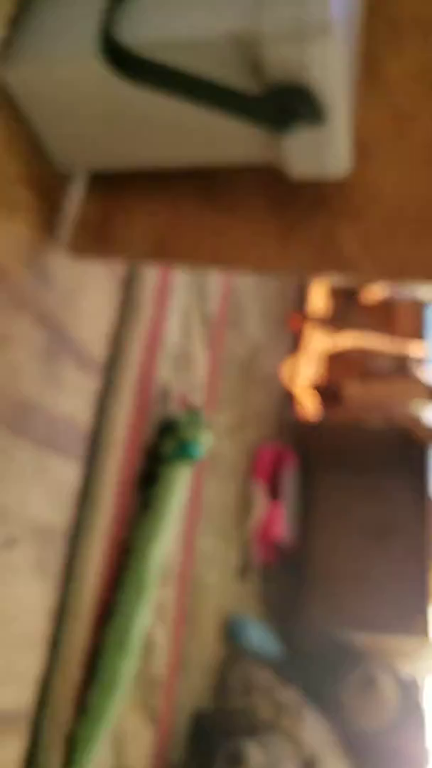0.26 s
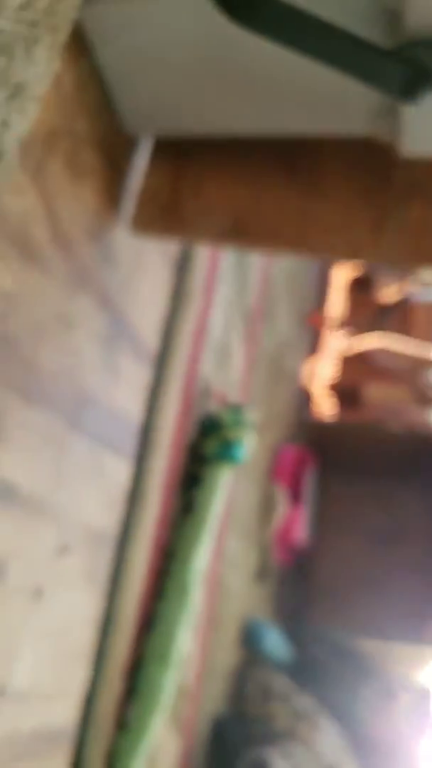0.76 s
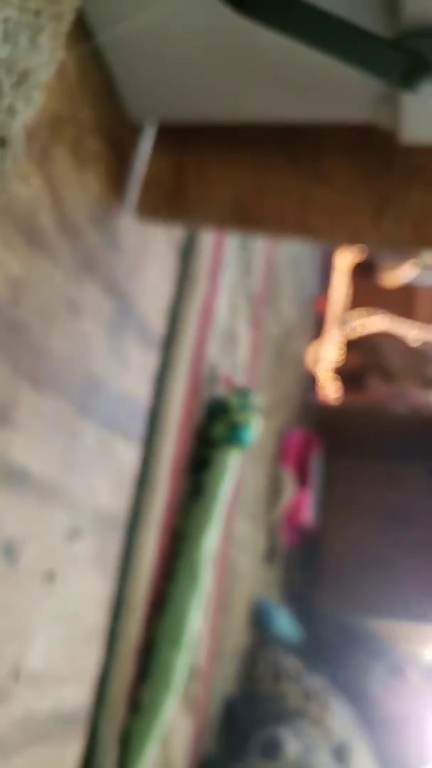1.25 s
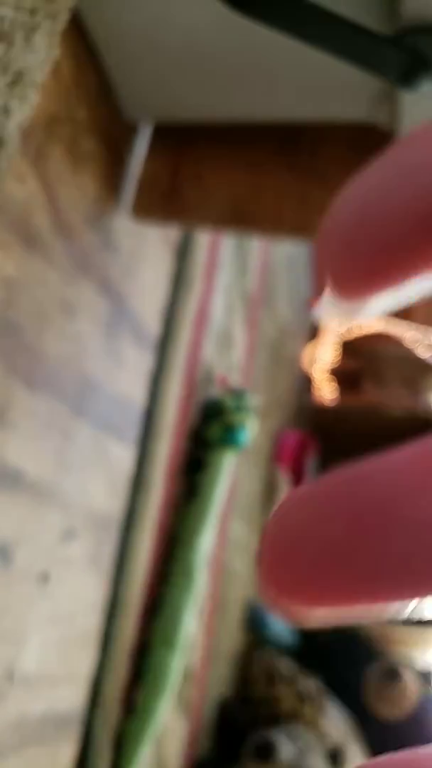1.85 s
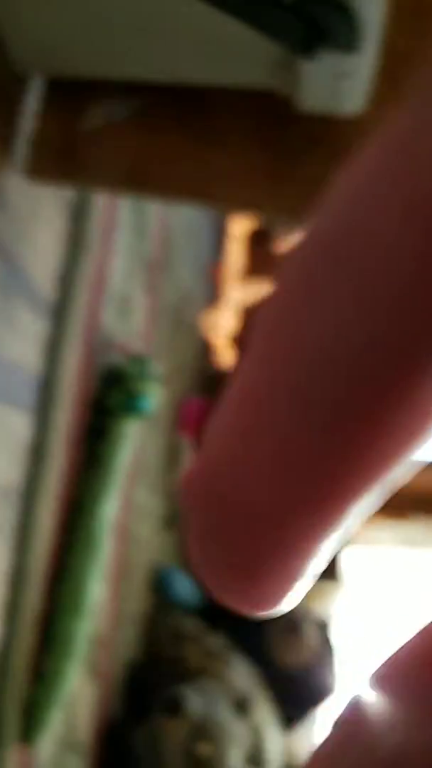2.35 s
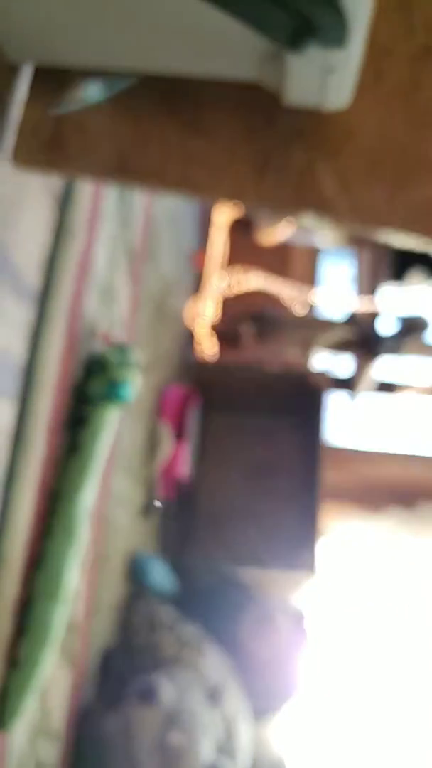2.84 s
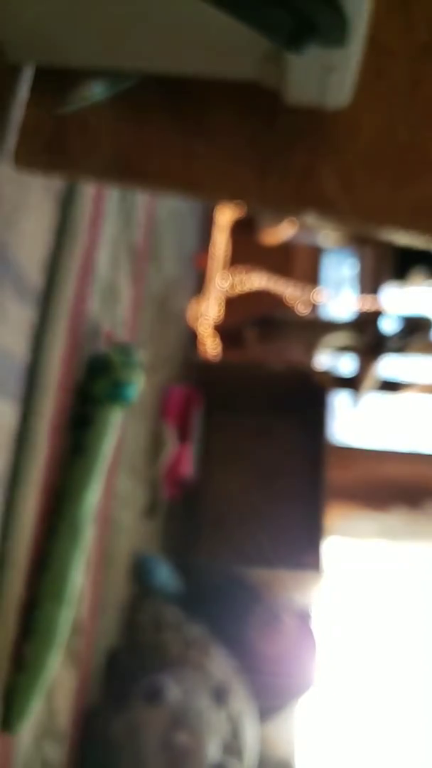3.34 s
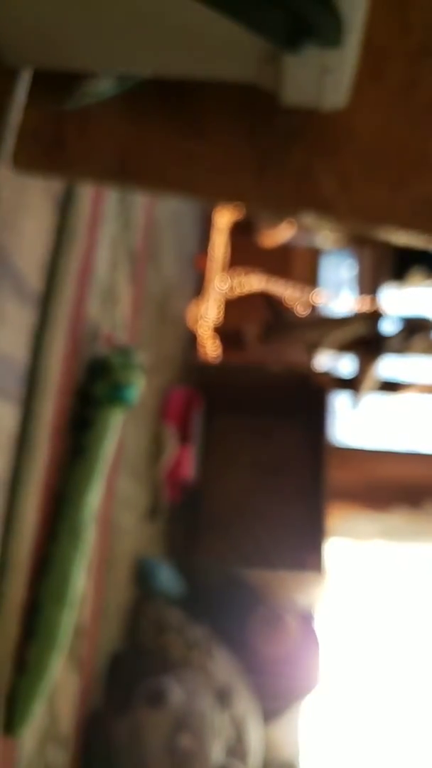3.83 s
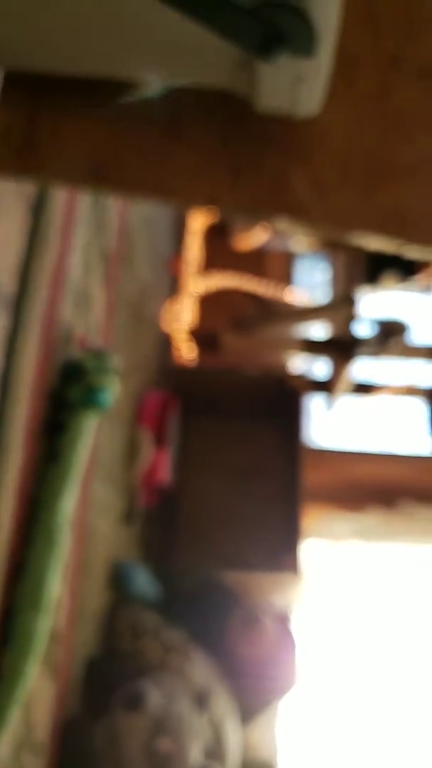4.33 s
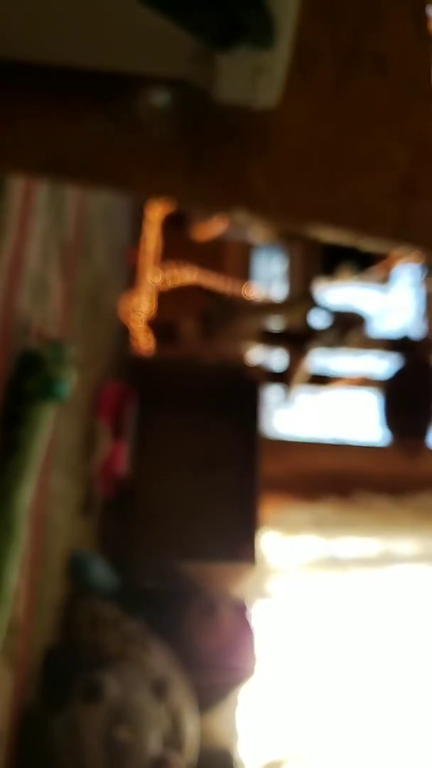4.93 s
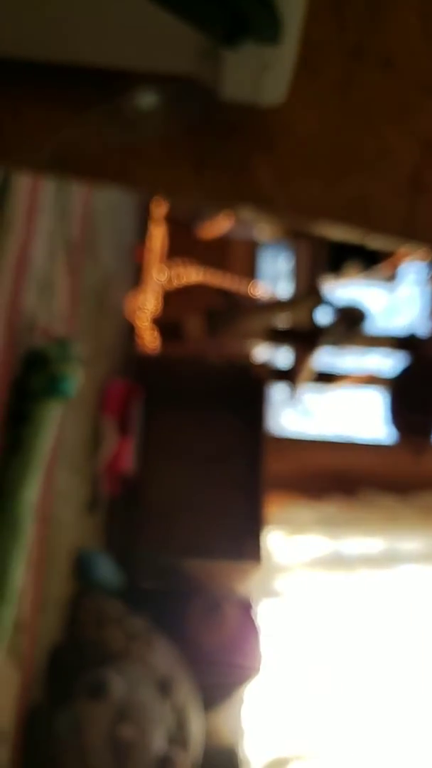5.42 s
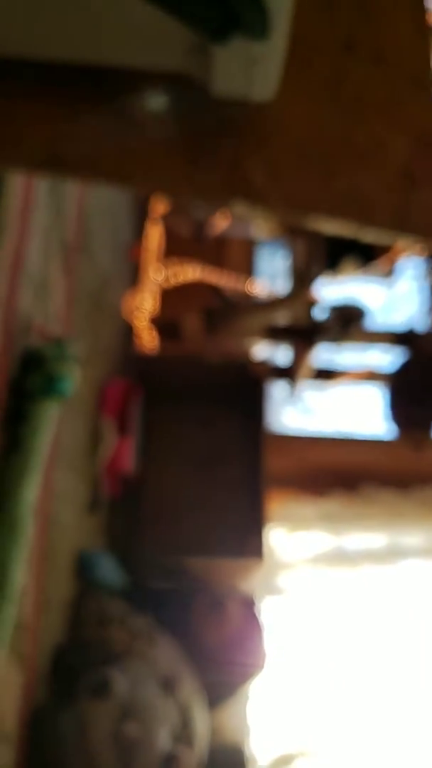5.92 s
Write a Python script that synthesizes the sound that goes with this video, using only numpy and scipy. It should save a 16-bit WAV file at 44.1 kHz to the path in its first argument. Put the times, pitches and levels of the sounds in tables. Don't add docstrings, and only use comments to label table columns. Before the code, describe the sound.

Kittens play around a low hand-held microphone indoors. First a rustling cloth rub with dull taps and thumps on the case, then brisk finger scrapes and dry clicks close on the left. A very loud snap stands out past the middle. Quieter scuffs follow, then a faint joint squeak, wooden knocks and a toy bouncing rapidly, all dry, with a distant pulsing washer beneath.

```python
import sys
import numpy as np
from scipy import signal
from scipy.fft import rfft, irfft, next_fast_len
from scipy.io import wavfile
from scipy.ndimage import uniform_filter1d

SR = 44100
rng = np.random.default_rng(int(sys.argv[2]) if len(sys.argv) > 2 else 0)


def decibels_to_gain(level_db):
    exponent = np.asarray(level_db, float) / 20
    return 10 ** exponent


def dump(signal):
    limited = np.clip(np.atleast_2d(signal).T, -1, 1)
    pcm = np.round(limited * 32767).astype(np.int16)
    wavfile.write(sys.argv[1], SR, pcm)


N = 271587

TOP_HZ = 15700


def evened(x):
    return x / np.sqrt(np.mean(x ** 2) + 1e-20)


def read(points, hz):
    f, value = np.transpose(points)
    return np.interp(np.log(hz + 1), np.log(f + 1), value)


def along(rows):
    s, *columns = np.transpose(rows)
    t = np.arange(s[0], s[-1], 1 / SR)
    return t, *(np.interp(t, s, c) for c in columns)


def add(mix, s, sound):
    part = mix[:, round(s * SR):][:, :sound.shape[1]]
    part += sound[:, :part.shape[1]]


def sides(lean_db):
    right = decibels_to_gain(-np.asarray(lean_db, float))
    return np.array([2 / (1 + right), 2 * right / (1 + right)])


def resonate(x, hz, width):
    pole = np.exp((2j * hz - width) * np.pi / SR)
    return 2 * signal.lfilter([1 - abs(pole)], [1, -pole], x).real


def band(x, colours, lo_hz, hi_hz, ref_lo_hz, ref_hi_hz):
    hz = np.fft.rfftfreq(x.shape[-1], 1 / SR)
    edges = 1 / np.sqrt((1 + (lo_hz / (hz + 1)) ** 12) * (1 + (hz / hi_hz) ** 12))
    colour = decibels_to_gain(np.array([read(c, hz) for c in colours]))
    z = rfft(x) * colour * edges * (hz < TOP_HZ)
    inside = irfft(z.mean(axis=0) * (hz > ref_lo_hz) * (hz < ref_hi_hz), x.shape[-1])
    return irfft(z, x.shape[-1]) / inside.std()


def friction(t, level_db, grip, colours, catch_db, grain_s, same):
    # lower edge f/Hz, upper edge f/Hz, reference from f/Hz, reference to f/Hz
    registers = [(1350, 9300, 1500, 8000), (9300, 30000, 10500, 15500), (200, 1350, 300, 1300)]
    fine_db, dull_db, right_db, fine_right_db = grip
    a, b, c = rng.standard_normal((next_fast_len(len(t) + 2048), 3)).T
    clumps = decibels_to_gain(catch_db * evened(uniform_filter1d(c, size=int(grain_s * SR))))
    slips = clumps * np.array([a, same * a + np.sqrt(1 - same ** 2) * b])
    body, fine, dull = (band(slips, colours, *edges)[:, :len(t)] for edges in registers)
    body[1] *= decibels_to_gain(right_db)
    fine[1] *= decibels_to_gain(fine_right_db)
    edge = np.clip(np.minimum(t + (t[0] == 0) - t[0], t[-1] - t) / 0.001, 0, 1)
    return t[0], decibels_to_gain(level_db) * (body + decibels_to_gain(fine_db) * fine + decibels_to_gain(dull_db) * dull) * edge


def rub(start, length, shape, level_db, grip, tilt_db=0):
    # f/Hz, spectral level/dB per Hz
    rub_colour = [
        [(200, -95), (550, -86.5), (1100, -86), (1600, -80.5), (2600, -71), (3100, -73), (3700, -69), (5200, -74.5), (7100, -73), (8500, -92), (10500, -95.5), (13000, -90.5), (15200, -89.5)],
        [(200, -87.5), (550, -93), (1100, -93.5), (1600, -94), (2600, -93.5), (3100, -94.5), (3700, -101.5), (5200, -99), (7100, -101), (8500, -105), (10500, -110), (13000, -104), (15200, -106)],
    ]
    t = np.arange(start, start + length, 1 / SR)
    colours = [[(hz, db + tilt_db * np.log2(hz / 3000)) for hz, db in port] for port in rub_colour]
    return friction(t, level_db + shape((t - start) / length), grip, colours, 1.9, 0.0033, 0.4)


def distant_grip(fine_db, dull_db):
    return fine_db, dull_db, 10 + .4 * dull_db, 9


def blow(row, modes, low_hz, high_hz, contact_s, tail_db, tail_t60, far_tilt_db, spread=.022, swell=0):
    s, peak_db, spot_hz, high_db, low_db, lean_db = row
    spot = (spot_hz, 3.0, 6.0 / spot_hz)
    hz, db, t60 = np.transpose(modes + [spot])[:, :, None]
    t, swing, hz = np.arange(4000) / SR, np.sign(hz), abs(hz)
    is_mode = (np.arange(len(hz)) < len(modes))[:, None]
    db = db + np.where(hz < low_hz, low_db, 0) + np.where(hz > high_hz, high_db, 0) * is_mode
    detune = 1 + spread * rng.standard_normal(hz.shape)
    low = hz < 600
    onset = (1 - np.exp(-t / (contact_s + swell * low / hz))) ** 2
    rings = swing * decibels_to_gain(db - 60 * t / t60) * np.sin(2 * np.pi * hz * detune * t) * onset
    dulled = rings * decibels_to_gain(far_tilt_db * np.log2(hz / 1500))
    far = (dulled * low).sum(axis=0) + np.roll((dulled * ~low).sum(axis=0), 22)
    scatter = decibels_to_gain(tail_db - 60 * t / tail_t60) * rng.standard_normal(len(t)) * (t > .001)
    scatter += t == 0
    sound = signal.fftconvolve(np.array([rings.sum(axis=0), far]), scatter[None], axes=1)
    sound /= abs(sound).max(axis=1, keepdims=True)
    return s + 0.00088, decibels_to_gain(peak_db) * sides(lean_db)[:, None] * sound


def room_tone():
    # f/Hz, spectral level/dB per Hz
    tone_colour = [
        [(25, -92), (53, -82), (120, -84), (170, -98), (400, -112), (1900, -117), (2400, -106), (3000, -117), (5400, -116), (5900, -110), (7300, -110), (8000, -128), (10500, -126), (15200, -114)],
        [(25, -91), (53, -83), (120, -84), (170, -96), (400, -113), (1500, -117), (2400, -120), (5000, -121), (6800, -124), (8600, -130), (10500, -125), (12500, -117), (15200, -121)],
    ]
    # f/Hz, likeness of the ports/1
    likeness = [(60, 0.85), (240, 1), (950, 0.083), (3770, 0.013), (15000, 0.01)]
    # f/Hz, rms level/dB
    hum_lines = [(113.8, -66), (52, -65.5)]
    frames, hz = N // 256 + 5, np.fft.rfftfreq(1024, 1 / SR)
    a, b, c, d, patches = rng.standard_normal((frames, 513, 5)).T
    patches = uniform_filter1d(patches, size=12, axis=0)
    patches = evened(uniform_filter1d(patches, size=14, axis=1))
    same = np.clip(read(likeness, hz), -1, 1)[:, None]
    left = a + 1j * b
    z = np.array([left, same * left + np.sqrt(1 - same ** 2) * (c + 1j * d)])
    colour_db = np.array([read(port, hz) for port in tone_colour])[:, :, None]
    z *= decibels_to_gain(colour_db + 1.5 * patches) * (hz < TOP_HZ)[:, None]
    hiss = signal.istft(z, nperseg=1024, noverlap=768)[1][:, :N]
    hum = sum(decibels_to_gain(db) * evened(resonate(resonate(rng.standard_normal(N), f, 7.0), f, 30)) for f, db in hum_lines)
    return decibels_to_gain(-61.5) * evened(hiss) + hum


def washer():
    # f/Hz, rms level/dB
    motor = [(156.1, -65), (296.1, -79), (360.7, -95.5), (597.5, -81.5), (721.4, -81.5), (791.3, -81.5),
             (839.8, -85), (947.5, -86)]
    # f/Hz, width/Hz, level/dB
    load = [(680, 230, -75), (820, 320, -79), (300, 130, -80.5), (190, 90, -73.5)]
    # f/Hz, peak level/dB, decay time t60/s
    reversal = (99.4, -28.5, 0.14)
    first_s, period_s = .40, .804
    since = (np.arange(N) / SR - first_s) % period_s
    pull = np.interp(since, [0, .06, .16, .46, .54, 1], [0.78, 0.47, 0.93, 0.63, 0, 0.087])
    noise = rng.standard_normal((2, N))
    tones = sum(decibels_to_gain(db) * evened(resonate(resonate(noise[0], f, 5.0), f, 40)) for f, db in motor)
    swish = sum(decibels_to_gain(db) * evened(resonate(resonate(noise, f, w), f, w)) for f, w, db in load)
    thud_hz, thud_db, thud_t60 = reversal
    thud = decibels_to_gain(thud_db - 60 * since / thud_t60) * np.sin(2 * np.pi * thud_hz * since)
    thud *= np.minimum(since / 0.077, 1)
    return pull * (tones * sides(-2.5)[:, None] + swish) + thud


def room(x):
    # f/Hz, decay time t60/s
    decay = [(200, 0.25), (1000, 0.11), (8000, 0.014)]
    echoes = np.zeros((2, SR // 2))
    at = np.arange(200, SR // 2 - 20, 20) + rng.integers(0, 20, (2, (SR // 2 - 201) // 20))
    np.put_along_axis(echoes, at, rng.choice([-1., 1.], at.shape), 1)
    hz, t, z = signal.stft(echoes, SR, nperseg=256)
    tail = signal.istft(z * decibels_to_gain(-60 * t / read(decay, hz)[:, None]), SR, nperseg=256)[1]
    return signal.fftconvolve(x.mean(axis=0)[None], tail / np.linalg.norm(tail[0]), axes=1)[:, :N]


def squeak():
    # t/s, f/Hz, level/dB, second harmonic relative to the first/dB
    pitch = [
        (5.215, 372, -67, -8),
        (5.275, 330, -60, -22),
        (5.335, 362, -62, -22),
        (5.37, 358, -62, -18),
        (5.40, 410, -68, -18),
        (5.47, 440, -68, -14),
        (5.54, 457, -65, -11),
        (5.66, 457, -65.5, -12),
        (5.89, 497, -72, -6),
    ]
    t, hz, level_db, second_db = along(pitch)
    levels_db = level_db, level_db + second_db, level_db + second_db - 15
    loose = np.interp(hz, [350, 440], [.05, .009])
    wander, flutter = (evened(uniform_filter1d(v, size=400)) for v in rng.standard_normal((len(t), 2)).T)
    turns = np.cumsum(hz * (1 + loose * wander)) / SR
    tone = sum(decibels_to_gain(db) * np.sqrt(2) * np.sin(2 * np.pi * (k + 1) * turns) for k, db in enumerate(levels_db))
    breath = evened(uniform_filter1d(rng.standard_normal(len(t)), size=250))
    tone += decibels_to_gain(level_db) * 11 * loose * breath * np.cos(2 * np.pi * turns)
    return t[0], tone * decibels_to_gain(1.6 * flutter) * sides(5.0)[:, None] * signal.windows.tukey(len(t), .06)


def board_blows(mix):
    # f/Hz, level/dB, decay time t60/s
    board = [(185, 0, 0.035), (355, 1.5, 0.042), (530, -9, 0.04), (690, -3, 0.016), (1226, 4, 0.012),
             (1755, -2, 0.008), (2750, 8, 0.0066), (4050, -7, 0.0083), (5100, -2, 0.006),
             (7000, -10, 0.0057)]
    # t/s, peak level/dB, strongest ring f/Hz, low modes/dB, left-right/dB
    knocks = [(4.937, -50, 654, -5, -16), (5.099, -62.5, 776, -12, 15), (5.211, -61, 686, -3, -1.5),
              (5.448, -58, 607, -2, 8), (5.501, -48, 610, -4, -1), (5.522, -51, 1200, -17, 9),
              (5.683, -52.5, 800, -5, 5.5), (5.822, -43, 877, -1, -7), (5.8525, -39, 1300, -4, -2.5)]
    # t/s, peak level/dB, low modes/dB, left-right/dB
    rattle = [(5.909, -28.5, -36, 7), (5.912, -28.5, -12, -4), (5.9156, -28.5, -6.5, 3),
              (5.92, -47, -18, 4), (5.9397, -29, -14.5, -4.5), (5.947, -29, -9.5, -7),
              (5.9534, -29.5, -18, 2.5), (5.998, -25.5, -13.5, 0), (6.0038, -28, -12, 0)]
    knocked = [(s, db, hz, -13, *rest) for s, db, hz, *rest in knocks]
    bounced = [(s, db, 1230, 25 + 1.22 * db, *rest) for s, db, *rest in rattle]
    for rows, knee_hz in ((knocked, 1000), (bounced, 2200)):
        for row in rows:
            add(mix, *blow(row, board, 600, knee_hz, 0.00025, -29, 0.062, -6.0, swell=.5))


def case_taps(mix):
    # f/Hz, level/dB, decay time t60/s
    case = [(273, 0, 0.019), (420, 2.5, 0.01), (1220, -9.5, 0.0065), (1510, -4.5, 0.0087),
            (1770, -12, 0.0013), (2416, -1.5, 0.0055), (2944, -18.5, 0.028), (4260, 7.5, 0.012),
            (4926, 2, 0.018), (7000, -13, .004)]
    # t/s, peak level/dB, strongest ring f/Hz, low modes/dB, left-right/dB
    tap_rows = [(0.24, -37, 430, -5, -2), (0.287, -38, 410, -6, -0.5), (0.57, -48, 1300, -28, 12.5),
                (1.665, -43.5, 834, -12.5, 10), (2.222, -21, 2270, -27, 13), (2.2245, -32, 950, -20, 13),
                (2.3846, -46, 1690, -30, 3), (2.472, -42, 3300, -30, 5), (3.406, -52, 1290, -18, 9),
                (3.977, -30, 1493, -10.5, 8), (4.286, -47, 1260, -15.5, 6.9), (6.023, -35.5, 1500, -14, 3)]
    for s, db, hz, *rest in tap_rows:
        add(mix, *blow((s, db, hz, -28, *rest), case, 700, 3500, 0.00026, -24, .012, -9.0))


def soft_blows(mix):
    # (t/s, peak level/dB, broad ring f/Hz, left-right/dB, scatter/dB) and the modes
    # f/Hz (negative: swings against the blow), level/dB, decay time t60/s
    paw = (0.758, -24, 1750, 12, -25), [(415, -14, .018), (-800, -12, .009), (1240, -2, .009),
           (1770, -9, .007), (-2900, -12, .005), (3850, -12, .004), (-5500, -8, .002)]
    toy = (0.8765, -12, 1750, 10, -33), [(807, -18, .015), (-1300, 0, .006), (-2550, -1, .005),
           (3120, -9, .006), (3950, -17, .008), (-4700, -9, .003)]
    claw = (1.062, -23, 2850, 11, -22), [(-700, -22, .008), (1280, -8, .007), (-1900, -7, .004),
            (2860, -2, .006), (-4050, -9.5, .006), (5150, -7, .006), (8400, -22, .004)]
    drop = (2.2165, -20, 2300, 9.5, -20), [(296, -11, .013), (-937, -14, .008), (1370, -7, .006),
            (-1830, -8, .005), (-3070, -8, .004), (6500, -16, .003)]
    for (s, db, hz, lean_db, tail_db), modes in (paw, toy, claw, drop):
        add(mix, *blow((s, db, hz, 0, 0, lean_db), modes, 0, SR, .00025, tail_db, .025, -8.0, 0))


def shove():
    # t/s, rocking f/Hz, level/dB
    rocking = [
        (1.588, 95, -62),
        (1.605, 80, -43),
        (1.63, 50, -42),
        (1.67, 48, -48),
        (1.71, 55, -49),
        (1.755, 58, -58),
        (1.785, 68, -49),
        (1.82, 55, -62),
    ]
    t, hz, level_db = along(rocking)
    rock = np.sqrt(2) * np.sin(2 * np.pi * np.cumsum(hz) / SR) * signal.windows.tukey(len(t), .1)
    return t[0], decibels_to_gain(level_db) * rock * sides(22.0)[:, None]


def creak(start, length, hz, level_db, blur_hz):
    t = np.arange(0, length, 1 / SR)
    phase_walk = np.cumsum(rng.standard_normal(4000))[:len(t)]
    turns = hz * t + phase_walk * np.sqrt(abs(blur_hz) / (2 * np.pi * SR))
    shape = np.interp(t / length, [0, .3, 1], [0, 1, 0])
    return start, decibels_to_gain(level_db) * 2 * shape * np.sin(2 * np.pi * turns) * sides(8)[:, None]


def creaks(mix):
    # t/s, length/s, f/Hz, level/dB, blur/Hz
    creak_rows = [(0.617, .014, 750, -60, 60), (0.846, .018, 1060, -56, 30), (0.857, .012, 720, -52, 30),
                  (0.888, .02, 2150, -60, 60), (0.906, .02, 1220, -59, 50), (0.942, .005, 2750, -53, 60),
                  (1.078, .01, 2400, -60, 100), (1.08, .012, 1000, -61, 60), (1.108, .045, 1190, -59, 50),
                  (1.974, .007, 3500, -53, 80), (2.007, .007, 3500, -54, 80), (2.082, .038, 550, -59, 20),
                  (2.38, .016, 790, -65, 30), (2.428, .045, 222, -47, 10), (2.472, .045, 2900, -59, 700),
                  (2.761, .008, 2700, -58, 100), (4.283, .012, 1200, -66, 30),
                  (4.385, .045, 3600, -80, 350), (4.565, .055, 3500, -75, 350),
                  (4.872, .045, 4000, -75, 600), (5.51, .03, 1220, -70, 30), (6.03, .035, 345, -54, 15)]
    for row in creak_rows:
        add(mix, *creak(*row))


def bump(rows):
    t, level_db, lean_db, hz = along(rows)
    a, b = rng.standard_normal((len(t), 2)).T
    push = resonate(np.array([a, 1.6 * a + .5 * b]), hz[0], 0.76 * hz[0])
    push = resonate(push, hz[0], 0.2 * hz[0])
    return t[0], evened(push) * decibels_to_gain(level_db) * sides(lean_db) * signal.windows.tukey(len(t), .3)


def bumps(mix):
    pushes = [
        (0.872, 0.05, -45.5, 4, 199),
        (1.609, 0.056, -45.5, 3, 191),
        (1.64, 0.06, -52, 15, 95),
        (1.773, 0.14, -56.5, 5, 187),
        (2.057, 0.06, -56, 4, 103),
        (2.45, .07, -54, 3, 170),
        (2.8, .25, -64, 6, 190),
        (3.954, 0.27, -49.5, 3.5, 99.7),
    ]
    for s, length, db, lean_db, hz in pushes:
        add(mix, *bump([(s + k * length / 2, db - 10 * abs(k), lean_db, hz) for k in range(-1, 2)]))


def rustles(mix):
    # t/s, length/s, level/dB, place of the peak/1, dull body/dB
    rustle_rows = [(1.875, .035, -68, .7, -12), (1.27, 0.12, -65.5, 0.42, 6.5),
                   (2.335, 0.14, -65, 0.42, -6.5), (2.423, 0.2, -65, 0.31, -3), (3.316, .024, -38, .3, -30),
                   (2.035, .06, -60, .6, -8), (5.497, .055, -72, .3, 0), (4.225, 0.082, -71, 0.78, -36.5),
                   (4.38, .06, -75, .7, -12), (5.495, 0.2, -75, 0.23, 2), (5.81, 0.26, -68.5, 0.86, 5.5),
                   (6.045, 0.12, -60, 0.1, -4.5)]
    for start, length, level_db, top, dull_db in rustle_rows:
        def shape(u):
            return np.interp(u, [0, top, 1], [-8, 0, -23.5])
        add(mix, *rub(start, length, shape, level_db, distant_grip(-17.5, dull_db)))


def settles(mix):
    # t/s, length/s, level/dB, fall/dB, dull body/dB
    settle_rows = [(1.07, 0.095, -60, 5.5, -4), (1.907, 0.068, -52, 25, -14.5),
                   (1.953, 0.067, -47.5, 20, -30), (2.225, 0.12, -59.5, 14.5, -6),
                   (2.654, 0.05, -60, 12, -26), (2.704, 0.034, -42, 9, -15.5),
                   (2.757, 0.076, -67.5, 12.5, -2.5), (3.308, .008, -36.5, 20, -34),
                   (3.98, 0.13, -65, 14, 0), (4.562, 0.065, -72, 5.5, -33), (4.87, .08, -70.5, 14, -35),
                   (4.935, 0.024, -79.5, 13, 13), (5.21, .09, -85.5, 15.5, 15.5)]
    for start, length, level_db, fall_db, dull_db in settle_rows:
        def shape(u):
            return -fall_db * u ** 0.61
        add(mix, *rub(start, length, shape, level_db, distant_grip(-22, dull_db)))


def slide():
    # t/s, level/dB, dull body/dB
    stroke = [(0.0, -60, -4.5), (0.1, -63, -4), (0.35, -66, -2), (0.52, -70, -1), (0.6, -66, 0),
              (0.78, -63.5, 1), (1.02, -60, -6), (1.24, -63, -5), (1.52, -64.5, -4.5), (1.64, -64, -0.5),
              (1.83, -79, -10), (1.96, -69, -8), (2.22, -65, -11)]
    # f/Hz, spectral level/dB per Hz
    slide_colour = [
        [(200, -83.5), (450, -91.5), (800, -88.5), (1500, -99.5), (2500, -92.5), (4500, -94), (7000, -94), (8800, -106), (10500, -101), (13000, -88.5), (15200, -84.5)],
        [(200, -86.5), (450, -90), (800, -99), (1500, -102.5), (2500, -101), (4500, -101), (7000, -102), (8800, -106), (10500, -106), (13000, -102), (15200, -110)],
    ]
    t, level_db, dull_db = along(stroke)
    return friction(t, level_db, (-1.5, dull_db, 1, 1), slide_colour, 1.6, 0.002, 0.042)


def swipe(start, length, level_db, near, dull_db):
    rise, hold = 0.019 / length, .75
    sag_db = -51.5 * length * (hold - rise)
    away, close = (-21.5, 1.3, 5.8), (-7.5, -41, -21.5)
    fine_db, right_db, fine_right_db = np.add(away, near * np.subtract(close, away))

    def shape(u):
        return np.interp(u, [0, rise, hold, 1], [-24.5, 0, sag_db, sag_db - 26])
    return rub(start, length, shape, level_db, (fine_db, dull_db, right_db, fine_right_db), (1 - near) * -3.5)


def swipes(mix):
    # t/s, length/s, level/dB, nearness to the port/1, dull body/dB
    swipe_rows = [
        (1.962, .083, -56, 1, -5),
        (2.064, 0.062, -48, 1, -12.5),
        (2.128, 0.072, -48, 1, -14),
        (2.714, 0.043, -39.5, 1, -26),
        (3.319, 0.078, -39.5, 0.01, -30.5),
        (3.562, 0.45, -51.5, 1, -32),
    ]
    for row in swipe_rows:
        add(mix, *swipe(*row))


def nail_snaps(mix):
    # f/Hz, level/dB, decay time t60/s
    port_modes = [(648, -16, 0.03), (1200, 5, 0.021), (2500, -2, 0.0029), (3670, 3, 0.0024),
                  (6340, 5, 0.0042), (8930, -31.5, .003), (12430, -5, .0015), (15900, -3.5, 0.0046)]
    # t/s, peak level/dB, strongest ring f/Hz, high modes/dB, left-right/dB
    snaps = [(1.907, -39.5, 7000, -8, 25), (1.951, -48, 6540, 15, 18), (2.009, -53, 7100, -29, -4),
             (2.266, -42, 5000, -30, 8), (2.701, -47, 2400, -20, 25), (2.7055, -35, 2100, -15, 31),
             (2.7295, -32, 4200, -5, 34), (2.7375, -29, 7300, -3, 34), (2.741, -31, 4000, -8, 34),
             (2.711, -31.5, 6960, -9.5, 34), (3.321, -30, 3900, -12, 25), (3.3237, -29, 3200, -12, 25),
             (4.045, -45, 7000, -13, 30), (4.231, -49.5, 6780, 10, 26), (4.563, -52, 6620, -1.5, 17),
             (4.782, -60, 7200, -5.5, 10.5), (4.871, -51, 4470, -3, 13), (2.151, -40, 2000, -10, 20),
             (2.278, -48, 5500, -20, 8), (5.983, -48, 4000, -20, 10)]
    for s, db, hz, high_db, lean_db in snaps:
        low_db = -12.5 - 0.92 * lean_db
        row = (s, db, hz, high_db, low_db, lean_db)
        add(mix, *blow(row, port_modes, 1500, 5000, .0001, -37, 0.0062, -6.5))


def hard_snaps(mix):
    # (t/s, peak level/dB, broad ring f/Hz, left-right/dB, scatter/dB) and the modes
    # f/Hz (negative: swings against the blow), level/dB, decay time t60/s
    nail = (1.984, -20, 5230, 12, -30), [(-393, -31, .012), (1680, -5, .004), (3750, -13, .005),
            (5260, -4, .005), (-6950, -4, .004), (8980, -22, .003)]
    flick = (2.6546, -34, 5400, 22, -24), [(2270, -5, .005), (-4680, -8, .03), (5610, -12, .022),
             (-5990, -13, .025), (6700, -9, .016)]
    clip = (2.704, -16.5, 6000, 31, -24), [(190, -18, .02), (820, -22, .008), (-2120, 0, .004),
            (-4650, -3, .005), (5600, -5, .005), (-7400, 0, .003)]
    crack = (3.977, -3.2, 5750, 36, -36), [(-680, -24, .007), (1330, -22, .006), (-2480, -9.5, .0035),
             (-3600, -4, .0035), (4080, -8, .003), (5650, -4, .002), (-7050, 2, .0022), (-8900, -19, .003),
             (12300, -13, .0015), (-15000, -10, .002)]
    for (s, db, hz, lean_db, tail_db), modes in (nail, flick, clip, crack):
        add(mix, *blow((s, db, hz, 0, 0, lean_db), modes, 0, SR, .0001, tail_db, .007, -6.5, 0))


def scene():
    near, about = np.zeros((2, 2, N))
    add(about, *squeak())
    for source in (board_blows, case_taps, soft_blows):
        source(about)
    add(near, *shove())
    add(near, *slide())
    for source in (creaks, bumps, rustles, settles, swipes, nail_snaps, hard_snaps):
        source(near)
    reverberant = decibels_to_gain(-48) * room(near) + decibels_to_gain(-20) * room(about)
    return near + about + reverberant + room_tone() + washer()


def roll_off(x):
    return signal.sosfilt(signal.butter(12, 16800, fs=SR, output="sos"), x)


def record(dry):
    held = dry / (1 + (dry / .95) ** 6) ** (1 / 6)
    lowpass = signal.firwin(151, 15600, window=("kaiser", 1.5), fs=SR)
    held = signal.oaconvolve(held, lowpass[None], "same")
    return roll_off(held)


dry = scene()
out = record(dry)
dump(out)
```